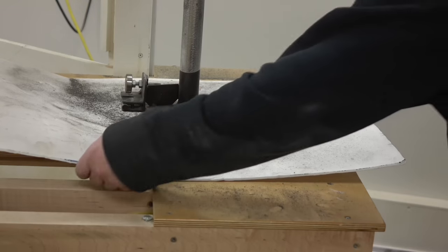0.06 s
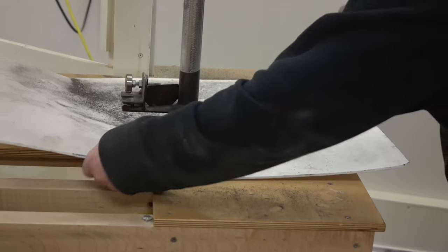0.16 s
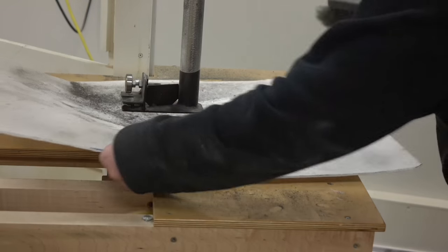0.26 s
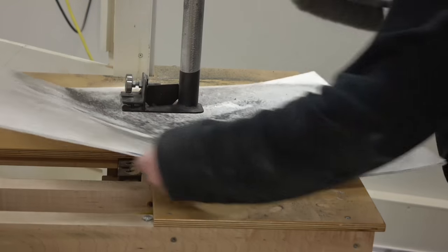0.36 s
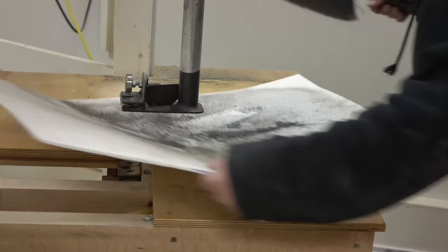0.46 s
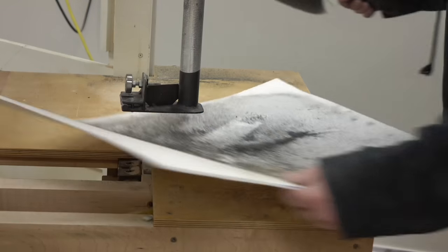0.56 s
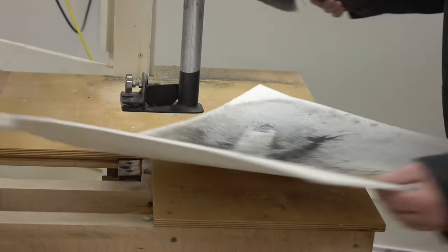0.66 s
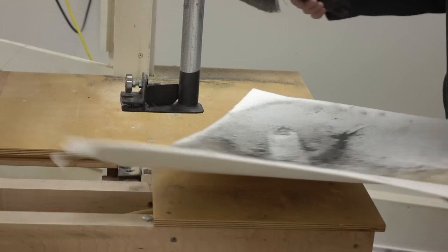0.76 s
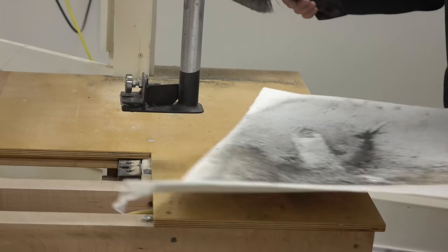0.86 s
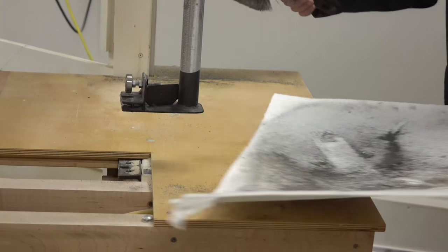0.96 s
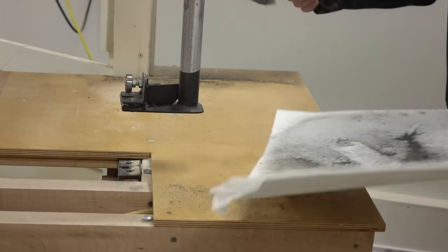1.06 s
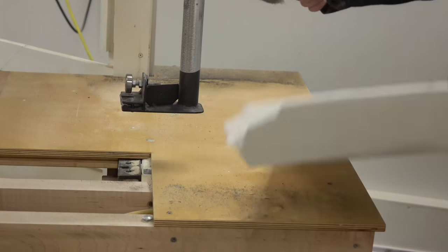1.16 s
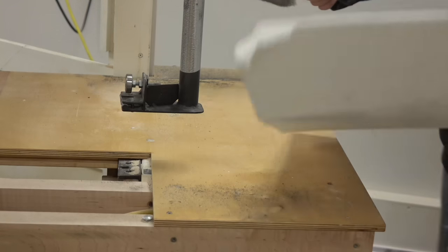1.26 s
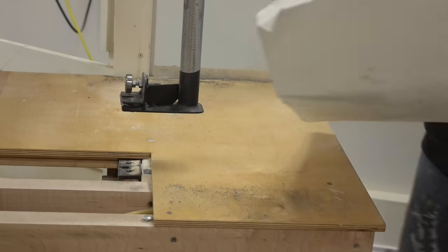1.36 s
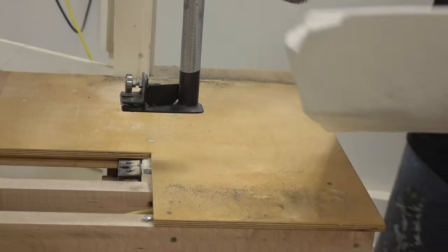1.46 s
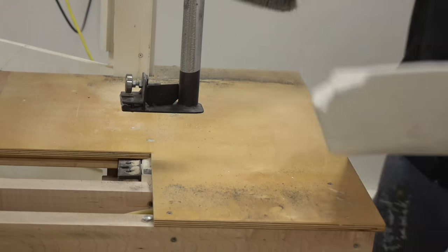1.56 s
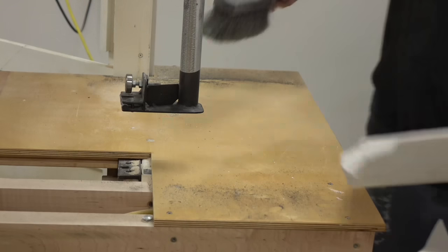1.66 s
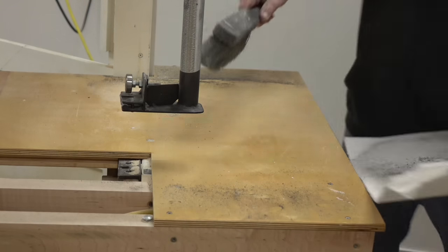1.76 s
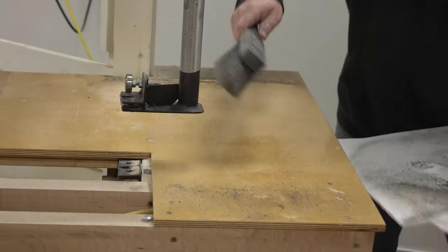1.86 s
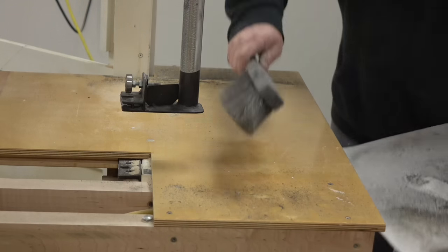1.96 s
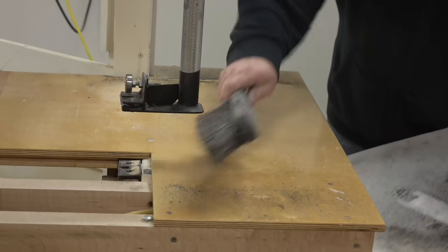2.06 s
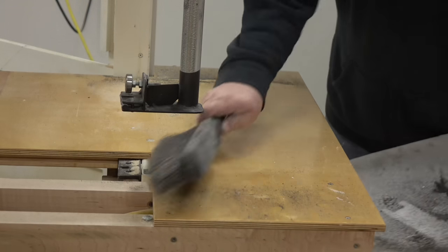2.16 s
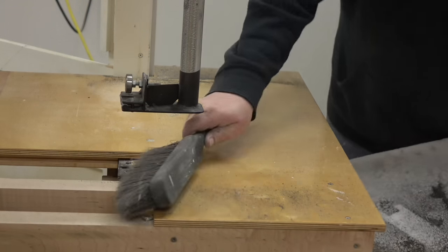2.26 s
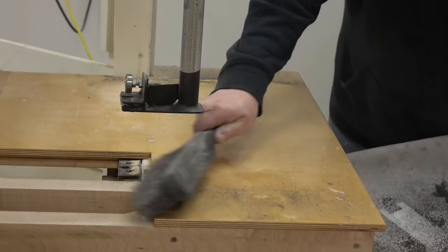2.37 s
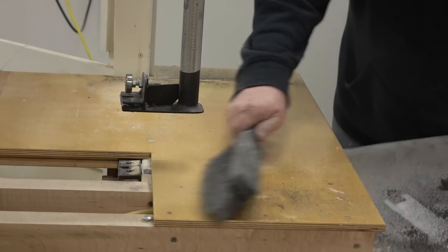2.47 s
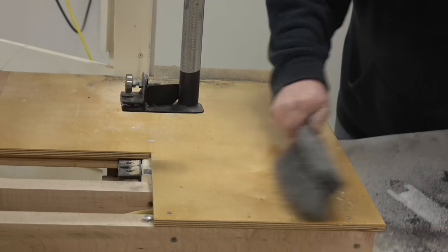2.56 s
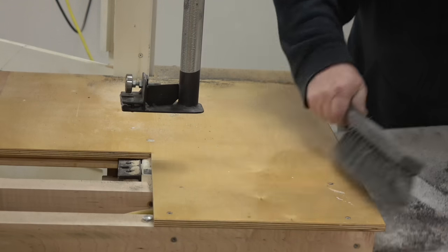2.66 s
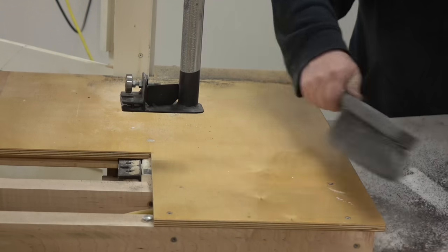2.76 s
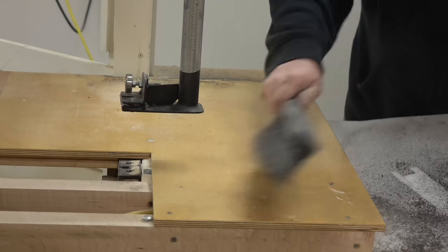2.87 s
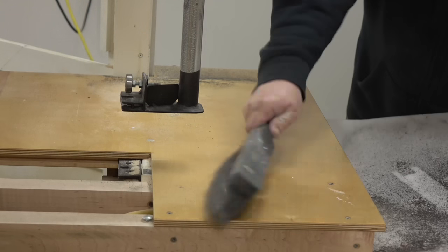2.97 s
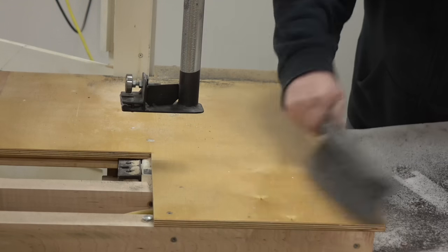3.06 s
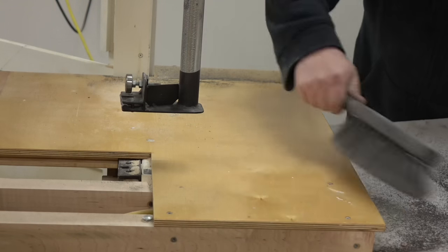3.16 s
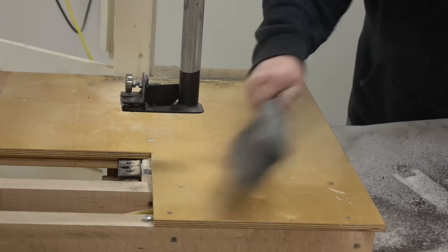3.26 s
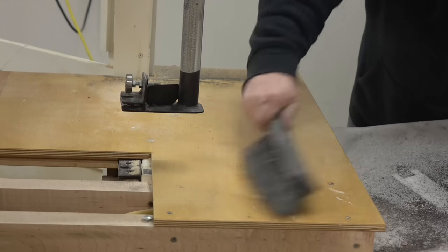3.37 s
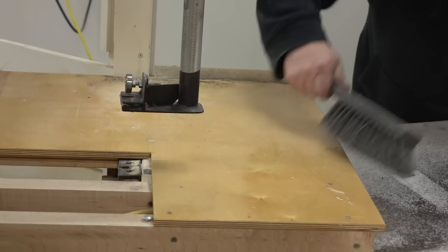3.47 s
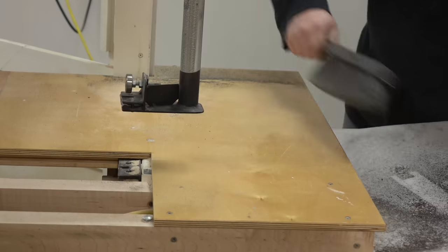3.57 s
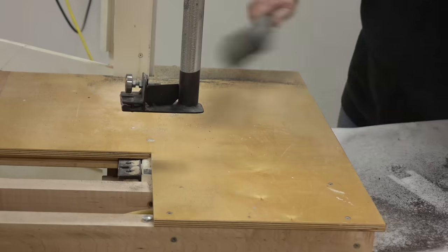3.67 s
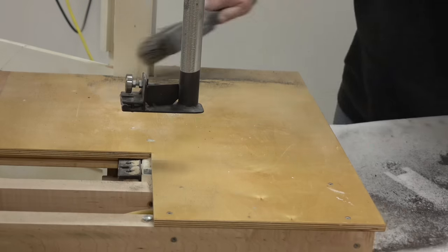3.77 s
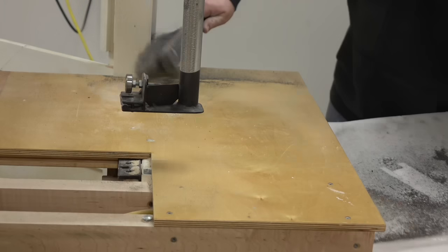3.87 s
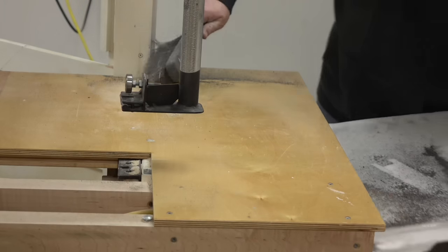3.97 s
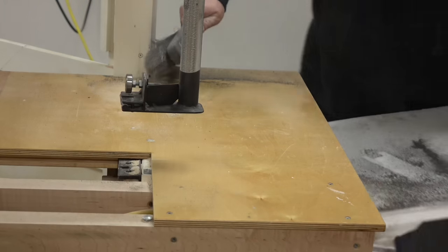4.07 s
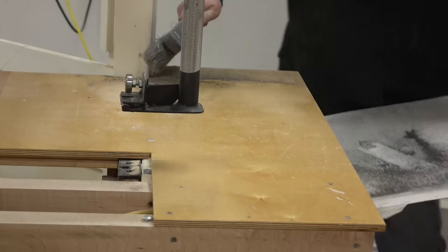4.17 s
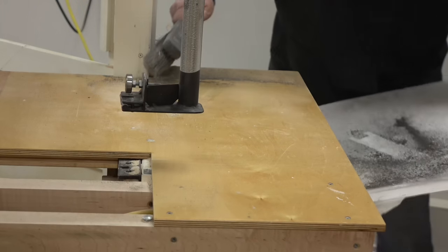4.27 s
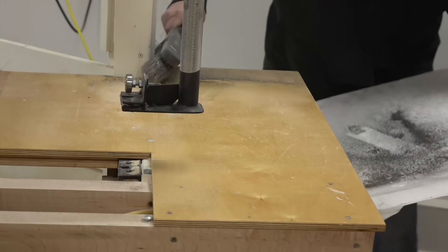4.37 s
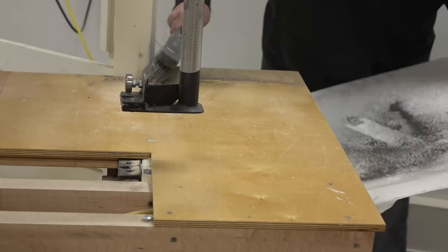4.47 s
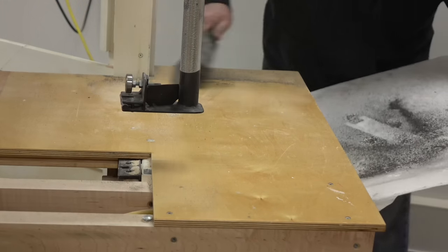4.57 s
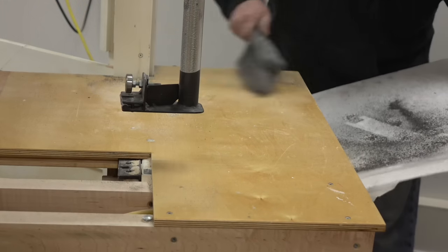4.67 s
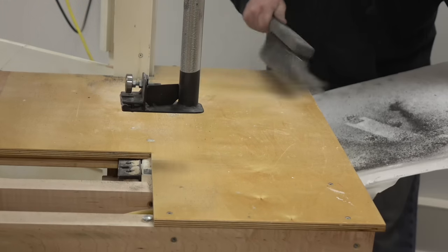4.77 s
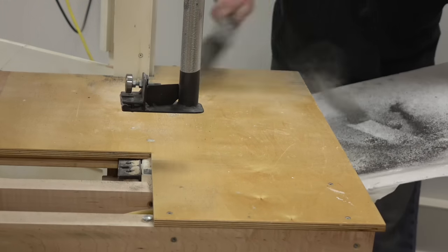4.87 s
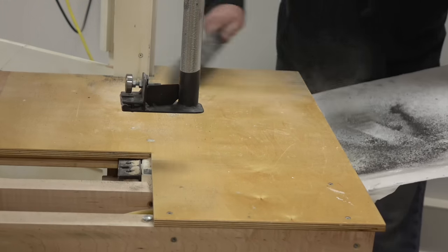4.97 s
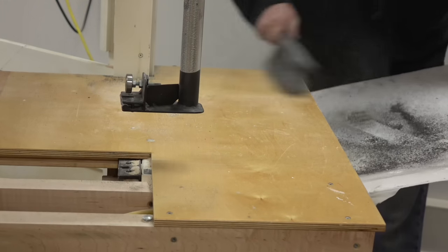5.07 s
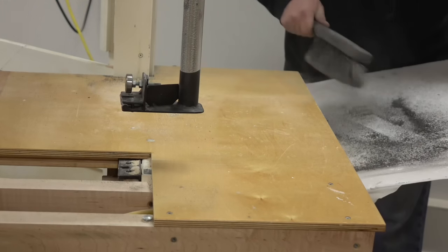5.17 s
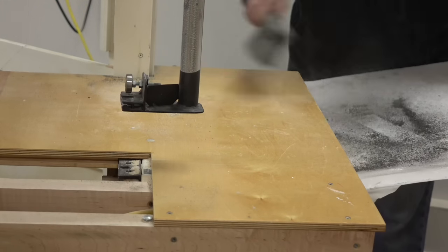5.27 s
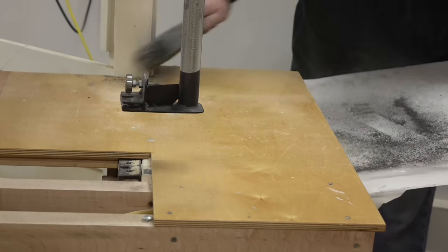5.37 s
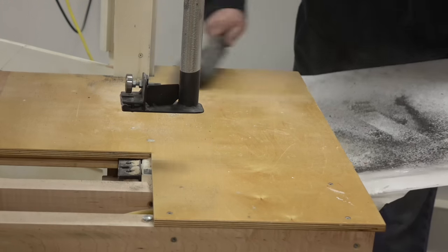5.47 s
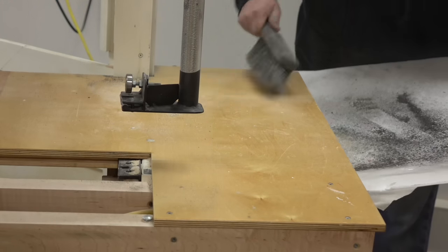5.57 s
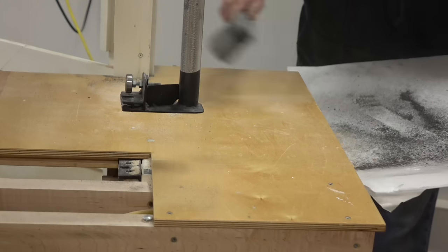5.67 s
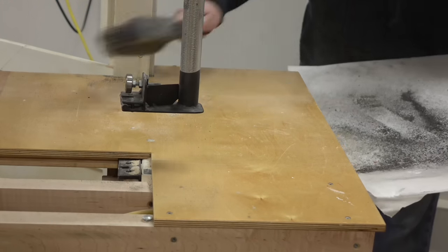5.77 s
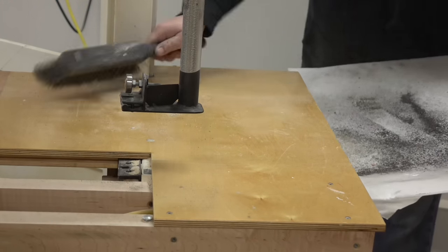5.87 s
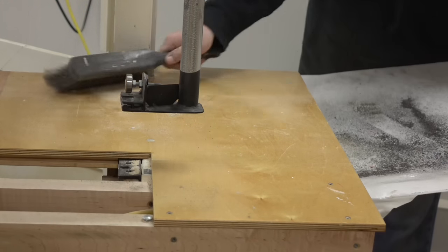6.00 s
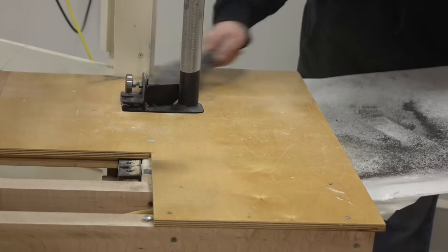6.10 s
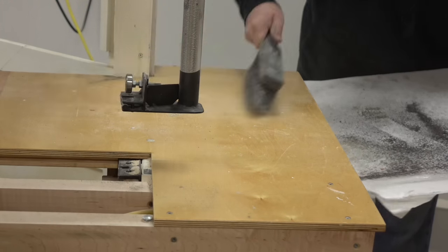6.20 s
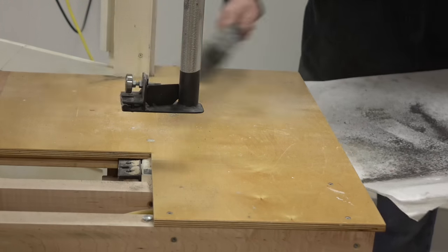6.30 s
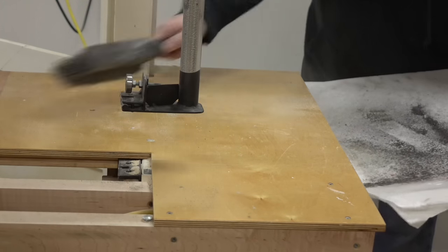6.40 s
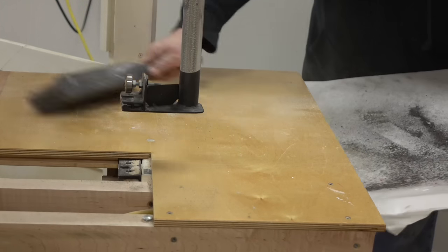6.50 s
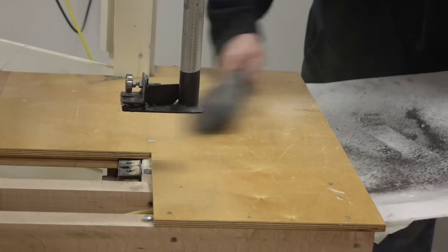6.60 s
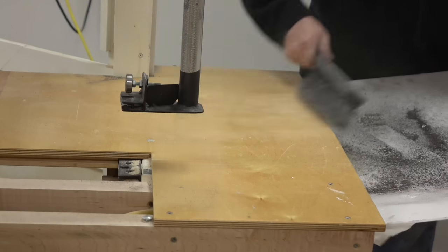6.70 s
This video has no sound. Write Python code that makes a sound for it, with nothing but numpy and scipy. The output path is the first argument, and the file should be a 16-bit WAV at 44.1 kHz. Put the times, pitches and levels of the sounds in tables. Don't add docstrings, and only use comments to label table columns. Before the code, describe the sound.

A stiff dusty sheet scrapes and snaps off a plywood table, then a hand brush sweeps grit away in hissing strokes with knocks and squeaks.

```python
import sys
import numpy as np
from scipy import signal
from scipy.fft import rfft, irfft, next_fast_len
from scipy.io import wavfile
from scipy.ndimage import uniform_filter1d, map_coordinates

SR = 44100
rng = np.random.default_rng(int(sys.argv[2]) if len(sys.argv) > 2 else 0)


def transcribe(signal):
    frames = np.atleast_2d(signal).T
    limited = np.clip(frames, -1, 1)
    pcm = np.round(limited * 32767).astype(np.int16)
    wavfile.write(sys.argv[1], SR, pcm)


def ratio_of_db(decibels):
    return 10 ** (np.asarray(decibels, float) / 20)


N = 297234

# [f/Hz, level/dB per Hz]
AIR_COLOUR = [(40, -9), (150, -15), (400, -24), (2000, -39), (6000, -31), (11000, -73)]
RUMBLE_COLOUR = [(32, -37), (45, -10), (70, -12.5), (130, -4), (190, -9), (300, -15)]
TIP_COLOUR = [(1600, -11), (2200, -4.5), (3600, -4), (6150, -0.5), (8000, -8), (10700, -17), (12800, -21),
              (15700, -35.5)]
GRIT_COLOUR = [(850, -80), (1050, 1), (1400, -0.5), (1900, -3.5), (2300, -5.5), (3200, -8)]
SCRAPE_COLOUR = [(480, -14.5), (640, 2), (780, 1.5), (980, 3.5), (1200, -46)]
# [f/Hz, width/Hz, level/dB]
FIRST_MODES = [(230, 78, -5.5), (326, 76, 1)]
SECOND_MODES = [(388, 68, -1.7), (499, 157, 1)]
UPPER_MODES = [(758, 38, -12.5), (1215, 54, -3.5), (1540, 125, -14.5), (2298, 79, -3.5)]
# [f/Hz, t60/s]
WALL_DECAY = [(300, 0.38), (10000, 0.081)]

# [t/s, level/dB, rise/s, fall/s]
JOLTS = [(0, -57, .1, 0.37), (1.62, -59, 0.038, 0.23), (1.69, -51.5, 0.093, 0.13), (2.2, -54, 0.13, 0.013),
         (2.249, -40, 0.0032, 0.25), (2.755, -43.5, 0.093, 0.076), (3.0, -58, 0.046, 0.14),
         (4.02, -56.5, 0.0642, 0.24), (4.27, -64, 0.075, 0.36), (4.305, -59, 0.16, 0.012),
         (4.405, -39, 0.017, 0.11), (4.517, -50, 0.11, 0.053), (5.18, -58.5, 0.16, 0.43),
         (5.4, -49.5, 0.12, 0.38), (5.94, -66, 0.2, 0.26), (6.1, -68.5, 0.22, 0.17), (.85, -66, .15, .3),
         (6.636, -49, 0.0095, 0.34), (6.69, -56, 0.11, 0.018)]
# [t/s, level/dB, rise/s, fall/s, deep hum over coarse scrape/dB]
SHEET_LOADS = [(.097, -55.5, 0.12, 0.063, -26), (0.289, -52, 0.037, 0.28, 17.5),
               (.58, -48, 0.47, 0.12, -15), (.635, -44, 0.012, 0.22, -6), (0.842, -49, 0.1, 0.18, -15.5),
               (1.062, -42, 0.039, 0.19, -12), (1.11, -42, 0.083, 0.1, -8), (1.17, -52, .1, .08, 6),
               (1.633, -42, 0.0065, 0.081, -2), (1.77, -45, 0.12, 0.1, 5.5),
               (1.97, -38.5, 0.053, 0.16, -13)]
BRUSH_LOADS = [(2.15, -51.5, 0.017, 0.042, 9), (2.25, -53, 0.014, 0.21, 25), (2.575, -50, 0.08, .12, -2),
               (2.705, -50.5, 0.042, 0.15, -2), (2.75, -48, 0.1, 0.044, -7), (3.0, -68, 0.12, 0.21, 2),
               (3.66, -68.5, 0.26, 0.43, 7.5), (3.97, -54.5, 0.041, 0.13, -21),
               (4.025, -47.5, .03, 0.07, 2), (4.09, -55.5, .06, 0.11, 3), (4.37, -50.5, 0.15, 0.12, -3),
               (4.41, -38, 0.021, 0.2, -4), (4.47, -37, 0.068, 0.059, -12), (4.8, -65.5, 0.16, 0.57, -18),
               (4.95, -59.5, 0.087, 0.1, -23), (5.12, -50.5, 0.16, 0.11, -1.5),
               (5.164, -43, 0.0091, 0.085, -11), (5.195, -40, 0.078, 0.14, 0.5),
               (5.402, -45.5, 0.1, 0.41, -2.5), (5.56, -52, 0.18, .07, 2), (5.69, -60, .06, 0.04, 16),
               (5.912, -64, .025, 0.15, 17), (6.07, -68, 0.03, 0.13, -2), (6.473, -53, 0.02, 0.22, -5.5),
               (6.64, -57, 0.098, 0.14, 20), (6.74, -55, 0.18, .2, 13)]
# [t/s, hiss level/dB, slide/s, lift/s, grit over hiss/dB]
LANDINGS = [(.016, -42, 0.008, 0.04, -3.5), (.032, -42, .005, .025, -3), (.101, -42, .004, .04, -6),
            (0.24, -44.5, .53, 0.22, -7), (1.0, -51, 0.012, 0.0821, 1), (1.28, -49.5, 0.075, 0.12, -3.5),
            (1.42, -71.5, .18, .1, 3.5), (1.634, -49, 0.063, 0.17, -1.5), (1.921, -39, 0.06, 0.077, -3.5),
            (2.144, -47.5, 0.094, 0.33, -5.5), (2.397, -49.5, 0.03, 0.14, 0),
            (2.696, -53.5, 0.049, 0.12, 6), (2.951, -43.5, 0.0037, 0.076, -13), (3.323, -45, .006, .04, -4),
            (3.33, -49, .01, 0.18, -4.5), (3.822, -49, .03, 0.093, -17), (4.271, -45.5, 0.089, 0.27, -6),
            (4.408, -37.5, 0.066, 0.11, -1), (3.812, -60, .01, .05, -10), (4.787, -61, .003, 0.11, 12),
            (4.94, -42.5, .005, 0.057, 2), (5.802, -56, 0.045, 0.15, -29), (5.902, -46, 0.0089, 0.17, -8.5),
            (6.354, -57.5, 0.065, 0.1, -17), (6.461, -44.5, 0.0038, 0.16, -0.5)]
# [t/s, hiss level/dB, slide/s, lift/s, grit over hiss/dB]
SLIDES = [
    (2.802, -56, 0.081, .15, -23),
    (3.02, -50.5, 0.1, 0.13, -15),
    (3.42, -57, 0.036, 0.25, -17),
    (4.17, -52, 0.16, 0.17, -7.5),
    (4.58, -49, 0.13, 0.11, -4.5),
    (5.01, -45.5, 0.14, 0.2, -8),
    (5.451, -44.5, 0.11, 0.11, -6.5),
    (6.089, -51.5, 0.11, 0.11, -26.5),
    (6.67, -54.5, .1, 0.067, -0.5),
]
# [t/s, hiss level/dB, rise/s, fall/s, grit over hiss/dB]
DRAGS = [(.05, -55, 0.013, 0.41, 3.5), (.07, -43, 0.05, 0.2, -5), (0.269, -40.5, 0.068, 0.32, -0.5),
         (.225, -50, 0.036, .05, 0), (.57, -44, 0.34, 0.095, 8.5), (0.636, -46.5, 0.018, 0.16, 12),
         (0.841, -38, 0.12, 0.17, -4), (.99, -48, 0.15, 0.01, -1.5), (1.069, -36, 0.074, 0.19, 0),
         (1.133, -35, .15, 0.079, -2.5), (1.625, -60.5, 0.079, 0.014, 3), (1.771, -44, 0.06, 0.12, 0.5),
         (1.994, -30.5, 0.066, 0.13, 0.5)]
# [t/s, hiss level/dB, rise/s, fall/s, grit over hiss/dB]
SWEEPS = [(2.547, -41.5, 0.14, 0.28, -3.5), (3.25, -66.5, 0.067, .2, -22), (2.43, -48, .04, .05, -3),
          (3.6, -62, .1, .15, -8), (3.675, -57, 0.08, 0.2, -2), (3.945, -49.5, 0.022, 0.17, 1),
          (4, -41, 0.1, 0.15, -0.5), (4.11, -44.5, .12, 0.055, -7.5), (4.891, -46.5, 0.038, 0.094, -5),
          (4.93, -43.5, 0.07, 0.015, -7), (5.12, -54.5, 0.14, 0.17, 10), (5.17, -49, 0.032, 0.19, 9.5),
          (5.355, -52, 0.005, 0.33, -4), (5.396, -44.5, 0.025, 0.1, 2), (5.688, -53.5, 0.094, 0.12, -8),
          (6.07, -50, 0.18, 0.15, -6.5), (6.587, -43.5, 0.092, 0.27, -14)]
# [from t/s, to t/s, highest octave level/dB]
BRISTLE_TILT = [(.2, .48, 5), (1.0, 1.2, -9.5), (1.2, 1.5, -27.5), (1.52, 1.9, -5.5), (1.9, 2.14, -6.5),
                (2.15, 2.3, 5), (2.68, 3.0, -3), (3.05, 3.17, 6), (3.2, 3.37, -6), (3.4, 3.5, 5.5),
                (3.62, 3.79, -27.5), (3.81, 3.9, 4.5), (4.05, 4.18, 8), (4.4, 4.54, -5), (4.76, 4.886, -20),
                (5.17, 5.35, -6.5), (5.36, 5.5, 4), (5.6, 5.89, -1.5), (5.92, 6.22, 4.5),
                (6.33, 6.45, -9.5), (6.52, 6.7, 2.5)]
# [from t/s, to t/s, belly level/dB]
GRAZES = [
    (3.47, 3.6, -5),
    (3.62, 3.72, -4),
    (3.73, 3.81, -7),
    (4.1, 4.25, -2.5),
    (5.81, 5.895, -14),
    (6.2, 6.34, -4),
    (6.37, 6.45, -4),
]

# [t/s, peak level/dB, f/Hz, t60/s]
TAPS = [(0.02, -35.5, 732, 0.054), (1.637, -32.5, 820, 0.046), (2.955, -43.5, 1196, 0.086),
        (3.11, -56, 1156, 0.13), (3.32, -42, 1243, 0.16), (3.41, -54, 1230, .08),
        (3.45, -53.5, 1250, 0.081), (3.67, -47, 1400, .04), (3.862, -34, 1135, 0.03),
        (3.953, -43, 758, 0.066), (3.976, -42, 1135, 0.054), (3.98, -36, 1895, 0.11),
        (4.18, -51, 1630, 0.16), (4.67, -56, 740, .3), (4.76, -58, 740, .3), (4.94, -38, 1123, 0.06),
        (5.955, -50, 1520, .12), (5.161, -35, 1002, 0.2), (5.189, -33, 782, 0.059),
        (5.674, -46.5, 659, 0.12), (5.909, -34.5, 782, 0.1), (6.462, -37, 1408, 0.095)]
# [t/s, peak level/dB, f/Hz, t60/s]
SNAPS = [(0.074, -36, 723, 0.034), (.033, -35.5, 850, .02), (0.101, -37, 2200, 0.03),
         (0.243, -35.5, 1310, 0.017), (0.284, -44, 1500, 0.017), (0.304, -29.5, 1350, 0.016),
         (0.327, -22, 1300, 0.0071), (0.413, -32.5, 1530, 0.024), (0.444, -31.5, 990, 0.023),
         (0.475, -24.5, 1370, 0.02), (0.519, -46, 1270, 0.015), (0.532, -22, 1280, 0.022),
         (0.554, -21.5, 1076, 0.02), (0.57, -21.5, 1390, 0.016), (0.585, -25.5, 2120, 0.01),
         (0.636, -20.5, 950, 0.012), (0.644, -26, 835, 0.013), (0.707, -25.5, 990, 0.013),
         (0.738, -30, 875, 0.0216), (1.016, -33, 2080, 0.034), (1.914, -33, 594, 0.04),
         (6.355, -42.5, 924, 0.034), (.273, -35, 1490, .015), (.294, -33, 1140, 0.017),
         (.367, -28, 1160, .012), (.406, -33, 1540, 0.023), (.42, -31, 1490, .015),
         (.492, -30, 1290, 0.016), (.555, -22, 1430, 0.014), (.558, -25.5, 734, 0.018),
         (.679, -28.5, 845, 0.013), (.762, -37, 800, 0.023), (5.225, -31, 950, 0.018),
         (5.26, -38, 700, .02)]
# [t/s, peak level/dB]
GRAIN_CRACKS = [(.101, -31), (1.278, -38), (2.697, -33), (2.703, -35), (2.732, -28), (2.8765, -39),
                (3.0352, -39), (3.1248, -41), (3.238, -44), (3.262, -53), (3.322, -37), (3.993, -31),
                (4.7842, -41), (5.3488, -38), (5.4073, -28), (5.48, -33), (5.802, -46), (6.3545, -46)]
# [t/s, peak level/dB, f/Hz, t60/s]
KNOCKS = [(1.035, -42, 480, .04), (1.285, -52, 480, .08), (1.33, -55.5, 480, 0.2), (2.41, -48, 330, .07),
          (2.478, -45, 320, .07), (4.645, -50, 330, .12), (1.627, -58, 302, 0.12), (1.955, -42, 568, 0.29),
          (2.194, -38.5, 88, 0.056), (2.14, -50, 120, .1), (2.236, -26, 140, 0.04),
          (2.256, -37, 243, 0.033), (2.291, -48, 197, 0.1), (2.694, -39, 407, 0.099),
          (3.993, -42, 526, 0.091), (4.015, -37, 283, 0.04), (4.07, -49.5, 264, 0.084),
          (4.194, -55, 506, 0.09), (5.66, -54, 327, 0.27), (4.26, -34, 132, 0.1),
          (4.396, -26.5, 544, 0.041), (4.942, -44, 296, 0.18), (5.396, -37.5, 359, 0.059),
          (6.474, -43, 326, 0.2), (6.629, -40, 308, 0.068), (6.624, -42, 199, .2), (2.665, -51, 330, 0.089),
          (3.665, -56, 320, 0.069), (.55, -49, 174, 0.076)]
# [t/s, peak level/dB, f/Hz, t60/s]
SQUEAKS = [
    (0.838, -34, 2850, 0.11),
    (0.9995, -30, 3960, 0.02),
    (3.3261, -33.5, 4110, 0.046),
    (4.9367, -36, 4100, 0.061),
    (5.9154, -40.5, 2270, 0.13),
    (5.803, -60, 2480, .12),
    (6.353, -46.5, 2870, 0.065),
    (6.4637, -35, 3225, 0.084),
    (6.5898, -36, 3890, 0.24),
]

# [f/Hz, level/dB per bin]
GATE_SILL = [(100, -125), (1000, -112), (4000, -122), (8000, -114), (11000, -102), (15000, -101)]
# [f/Hz, level/dB]
MASK_DEPTH = [(150, -40), (400, -12), (2100, -12), (2700, -65)]
# [from t/s, to t/s, sill raise/dB]
CLAMPS = [
    (3.17, 3.23, 10),
    (3.37, 3.47, 23),
    (5.73, 5.79, 11),
    (5.8, 5.89, 5),
    (6.165, 6.235, 8),
]

STILL_GRIT_DB, STILL_HUM_DB, STILL_FRAME_DB = -102.5, -83, -86


def unit(x):
    return x / np.sqrt(np.mean(x ** 2) + 1e-20)


def along(points, hz):
    f, v = np.transpose(points)
    return np.interp(np.log(hz + 1), np.log(f + 1), v)


def filtered(x, response):
    m = next_fast_len(N + SR // 2)
    return irfft(rfft(x, m) * response(np.fft.rfftfreq(m, 1 / SR)), m)[:N]


def coloured(x, spectrum):
    lowest, highest = spectrum[0][0], spectrum[-1][0]
    return filtered(x, lambda hz: ratio_of_db(along(spectrum, hz)) * (hz > lowest) * (hz < highest))


def modes(table):
    def response(f):
        total = 0
        for k, (centre, width, db) in enumerate(table):
            damping = 1j * f * width
            total = total + (-1) ** k * ratio_of_db(db) * damping / (centre * centre - f * f + damping)
        return total
    return response


def wobble(rate):
    knots = rng.standard_normal(int(N * rate / SR) + 4)
    return map_coordinates(knots, [np.arange(N) * rate / SR])


def contacts(rate, spread_db, smooth, patchy_db):
    chance, sign, size = rng.random((3, N))
    slips = (chance < rate / SR) * np.sign(sign - .5) * ratio_of_db(-spread_db * np.log(size + .02))
    rub = np.sqrt(1 - smooth) * unit(slips) + np.sqrt(smooth) * rng.standard_normal(N)
    z = signal.stft(rub, nperseg=512)[2]
    patches = uniform_filter1d(rng.standard_normal(z.shape), size=3, axis=0)
    patches = uniform_filter1d(patches, size=7, axis=1)
    return signal.istft(z * ratio_of_db(patchy_db * unit(patches)), nperseg=512)[1][:N]


def steady(x, hold):
    x = unit(x)
    envelope = np.abs(signal.hilbert(x, next_fast_len(N))[:N])
    return unit(x / (envelope + 0.12) ** hold)


def swells(s, db, rise, fall, hold=0, steep=1, rest_db=-110):
    t = np.arange(0, N / SR + .002, .001)[:, None]
    away = np.maximum(s - t, 0) / rise + np.maximum(t - s - hold, 0) / fall
    levels = db - 20 * steep * away ** 1.096
    total = 10 * np.log10(np.sum(ratio_of_db(levels) ** 2, axis=1) + ratio_of_db(rest_db) ** 2)
    return np.interp(np.arange(N) / SR, t[:, 0], total)


def spells(table):
    t = np.arange(N) / SR
    return uniform_filter1d(sum(db * ((t > a) & (t < b)) for a, b, db in table), size=SR // 40)


def load(lean, offset_db, rest_db, grows=1):
    s, db, rise, fall, depth = np.transpose(SHEET_LOADS + BRUSH_LOADS)
    return swells(s, grows * db + lean * depth + offset_db, rise, fall, rest_db=rest_db)


def rings(events, lag, attack, rough, gain_db):
    out, t = np.zeros(N + SR), np.arange(SR // 4) / SR
    seeds = rng.standard_normal((len(events), len(t)))
    for (s, db, hz, t60), seed in zip(events, seeds):
        waver = rough * uniform_filter1d(np.cumsum(seed), size=8) * np.sqrt(hz / SR)
        shape = ratio_of_db(-60 * t / t60) * (1 - np.exp(-t / attack))
        start = round((s + lag) * SR)
        out[start:start + len(t)] += ratio_of_db(db + gain_db) * shape * np.sin(2 * np.pi * hz * t + waver)
    return out[:N]


def room():
    return ratio_of_db(-70 + 0.44 * wobble(5.95)) * unit(coloured(rng.standard_normal(N), AIR_COLOUR))


def table_top():
    first_db = load(0.5, 0, STILL_HUM_DB)
    second_db = load(-0.14, 21, STILL_HUM_DB, grows=1.566)
    rumble_db = swells(*np.transpose(JOLTS), rest_db=STILL_FRAME_DB)
    rub = contacts(300, 3.1, 0.41, 1.0)

    def hum(table):
        return steady(filtered(rub, lambda f: modes(table)(f) ** 2), 0.037)

    rumble = steady(coloured(rng.standard_normal(N), RUMBLE_COLOUR), 0.15)
    return (ratio_of_db(first_db - 3.0) * hum(FIRST_MODES)
            + ratio_of_db(second_db - 3.5) * hum(SECOND_MODES)
            + ratio_of_db(rumble_db - 2.5) * rumble)


def strokes():
    land, swing = np.transpose(LANDINGS + SLIDES), np.transpose(DRAGS + SWEEPS)
    s, db, fall, grit = (np.r_[land[k], swing[k]] for k in (0, 1, 3, 4))
    touch_s, ease_s = 0.0065, 0.15
    rise = np.r_[[touch_s] * len(LANDINGS), [ease_s] * len(SLIDES), swing[2]]
    hold = np.r_[land[2], 0 * swing[0]]
    hiss_db = swells(s, db, rise, fall, hold)
    grit_db = swells(s, db + grit, rise, fall, hold, 1.25, STILL_GRIT_DB)
    return hiss_db, grit_db


def bristle_tips(hiss_db, drag):
    tips = unit(coloured(contacts(9000, 2.5, .6, 1.8), TIP_COLOUR))
    highest_octave = filtered(tips, lambda hz: 1 / (1 + (9500 / (hz + 1)) ** 8))
    belly = filtered(tips, lambda hz: 1 / (1 + (hz / 4000) ** 8))
    sheen_db = spells(BRISTLE_TILT)
    light_db = np.minimum(0.35 * (hiss_db + 54.5), 0) + spells(GRAZES)
    tips = tips + (ratio_of_db(sheen_db) - 1) * highest_octave + (ratio_of_db(light_db) - 1) * belly
    return ratio_of_db(hiss_db + 1.1 * drag) * tips


def rolling_grit(fine_db, drag):
    coarse_db = load(-0.35, 0, STILL_GRIT_DB)
    rub = contacts(1600, 3.0, 0.38, 2.45)
    rub = rub + ratio_of_db(10.5) * filtered(rub, modes(UPPER_MODES))
    fine = unit(coloured(rub, GRIT_COLOUR))
    coarse = steady(coloured(rub, SCRAPE_COLOUR), 0.13)
    return (ratio_of_db(fine_db - 2.82 + 1.2 * drag + 1.0 * wobble(70)) * fine
            + ratio_of_db(coarse_db - 3.0 + 2.0 * drag) * coarse)


def brushing():
    hiss_db, fine_db = strokes()
    drag = wobble(40)
    return bristle_tips(hiss_db, drag) + rolling_grit(fine_db, drag)


def taps():
    return rings(TAPS, 0.00076, 0.0048, 0.33, 0.35)


def snaps():
    return filtered(rings(SNAPS, 0.00045, 0.00059, 0.58, 2.84), lambda f: (1j * f / (330 + 1j * f)) ** 2)


def ticks():
    out, t = np.zeros(N + SR), np.arange(SR // 50) / SR
    bursts = rng.standard_normal((len(GRAIN_CRACKS), len(t)))
    for (s, db), burst in zip(GRAIN_CRACKS, bursts):
        crack = ratio_of_db(-60 * t / .008) * burst
        start = round(s * SR)
        out[start:start + len(t)] += ratio_of_db(db + 9) * crack / np.abs(crack).max()
    return filtered(out[:N], lambda f: modes([(3000, 6000, 0)])(f) ** 2 * (f < 15600))


def knocks():
    return rings(KNOCKS, 0.0062, 0.00076, 0.27, 4.25)


def squeaks():
    return rings(SQUEAKS, 0.000725, 0.00027, 0.8, -2.8)


def walls(x):
    hz, t, z = signal.stft(rng.standard_normal(SR // 2), SR, nperseg=256)
    tail = signal.istft(z * ratio_of_db(-60 * t / along(WALL_DECAY, hz)[:, None]), SR, nperseg=256)[1]
    late = np.pad(x, (300, 0))
    return signal.fftconvolve(late, tail / np.linalg.norm(tail))[:N]


def scene():
    blows = taps() + snaps() + ticks() + knocks() + squeaks()
    mono = room() + table_top() + brushing() + blows + ratio_of_db(-13.0) * walls(blows)
    mono = filtered(mono, lambda f: (1j * f / (44.4 + 1j * f)) ** 2)
    return np.array([mono, mono])


def band_limit(x):
    return signal.sosfilt(signal.butter(12, 15760, fs=SR, output="sos"), x)


def record(dry):
    hz, frames, z = signal.stft(dry, SR, nperseg=1024)
    power = uniform_filter1d(np.abs(z) ** 2, size=7, axis=1)
    power = np.abs(uniform_filter1d(power, size=3, axis=2))
    moment = np.roll(power.mean(axis=1, keepdims=True), 4, axis=2)
    sill = ratio_of_db(along(GATE_SILL, hz))[:, None] ** 2 + ratio_of_db(along(MASK_DEPTH, hz))[:, None] ** 2 * moment
    low_middle = (hz > 220) & (hz < 1250)
    clamp_db = np.interp(frames, np.arange(N) / SR, spells(CLAMPS))
    sill = sill * ratio_of_db(2 * np.outer(low_middle, clamp_db))
    opening = 1 - 1 / (1 + (power / sill) ** 8)
    kept = signal.istft(z * opening, SR, nperseg=1024)[1][:, :N]
    return band_limit(kept)


dry = scene()
out = record(dry)
transcribe(out)
```